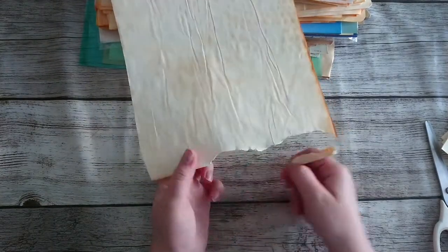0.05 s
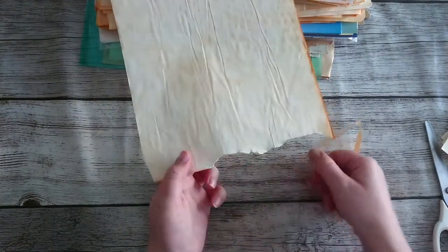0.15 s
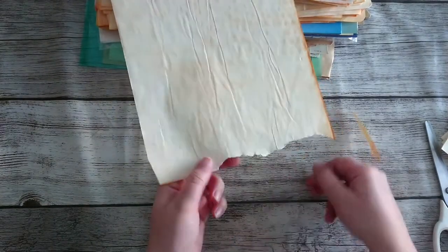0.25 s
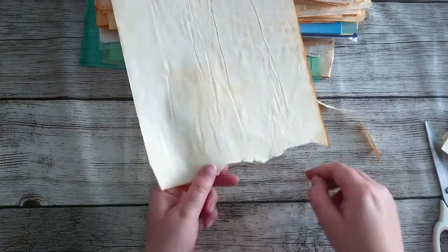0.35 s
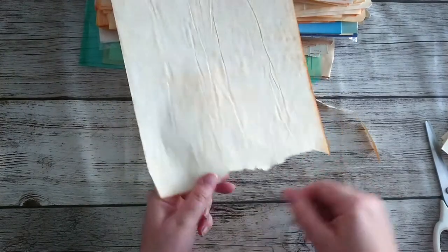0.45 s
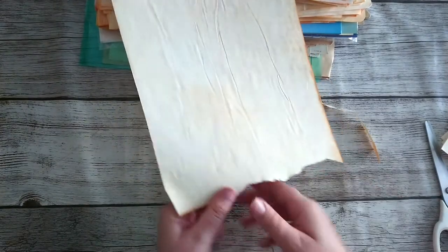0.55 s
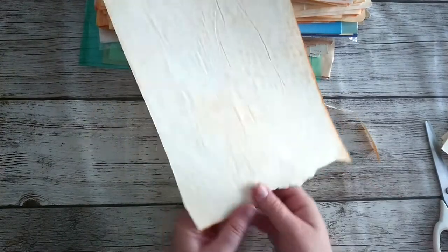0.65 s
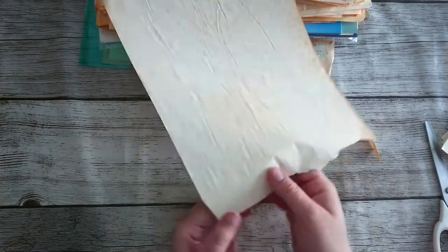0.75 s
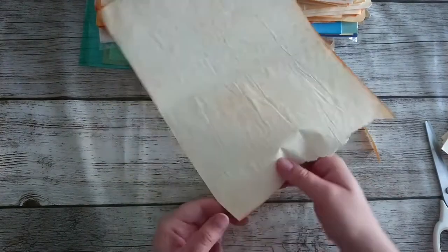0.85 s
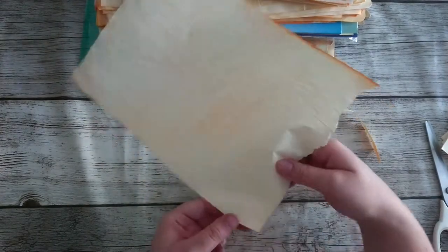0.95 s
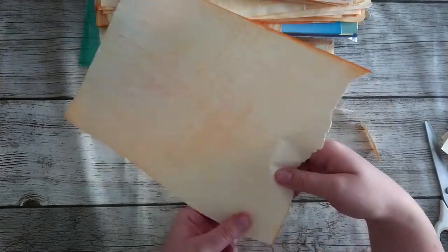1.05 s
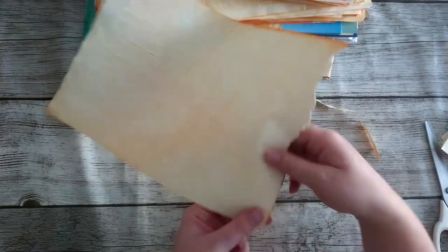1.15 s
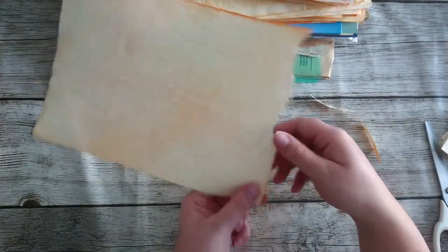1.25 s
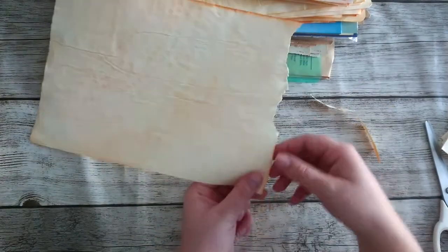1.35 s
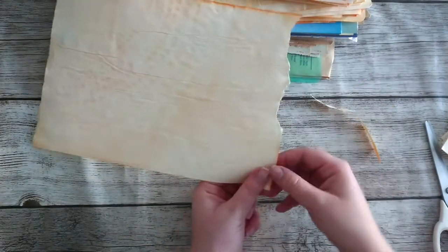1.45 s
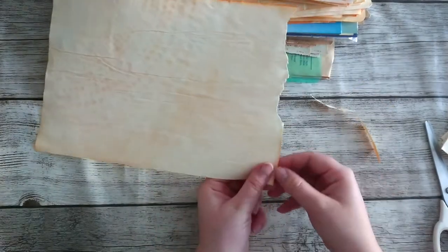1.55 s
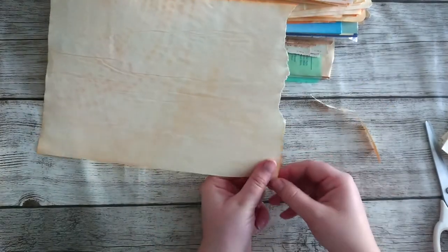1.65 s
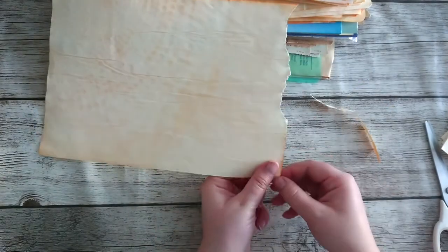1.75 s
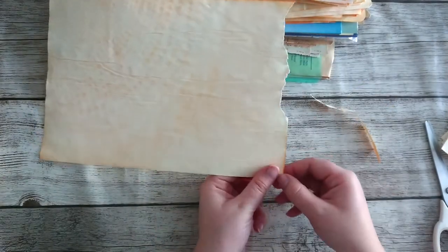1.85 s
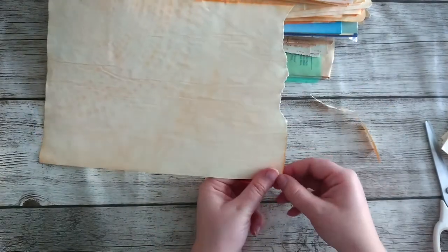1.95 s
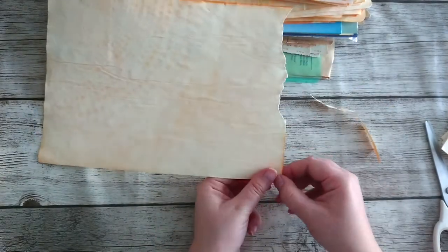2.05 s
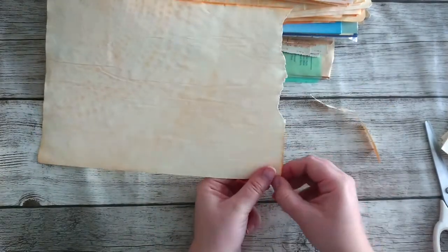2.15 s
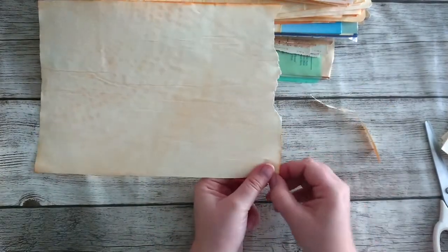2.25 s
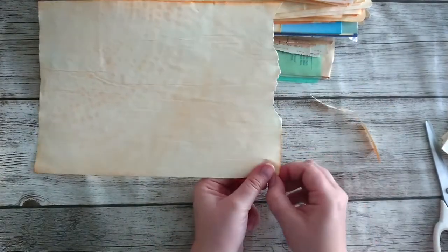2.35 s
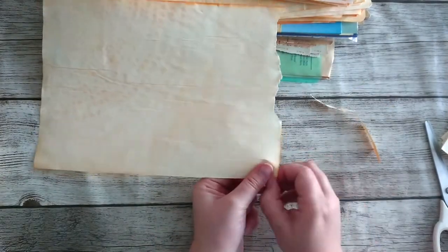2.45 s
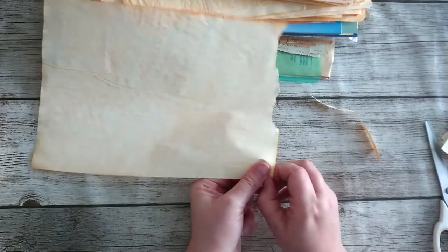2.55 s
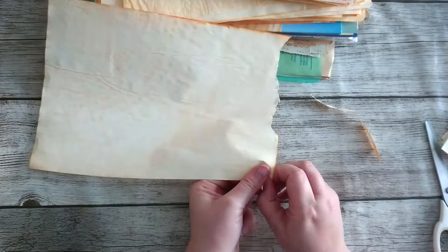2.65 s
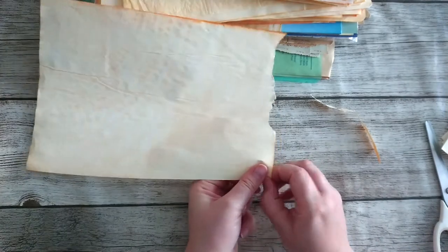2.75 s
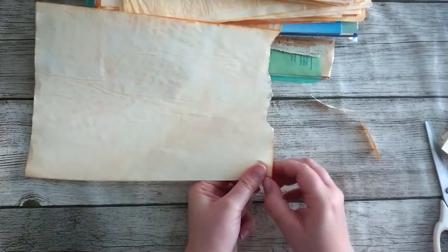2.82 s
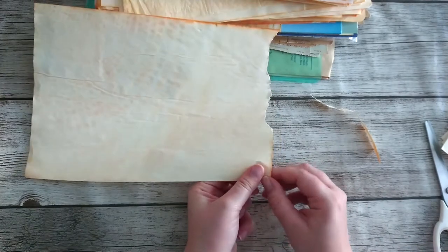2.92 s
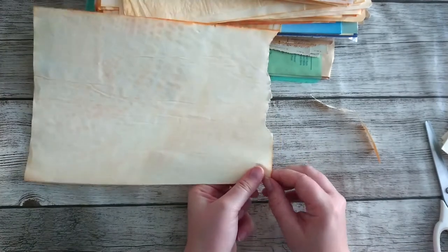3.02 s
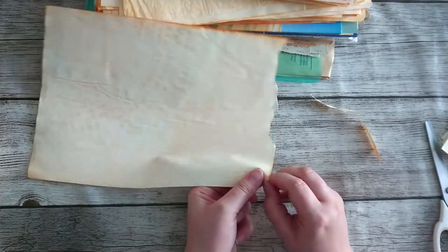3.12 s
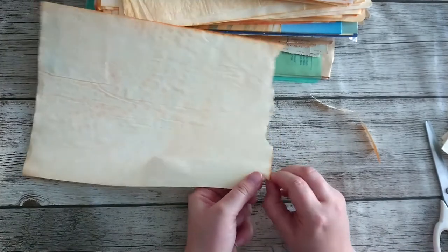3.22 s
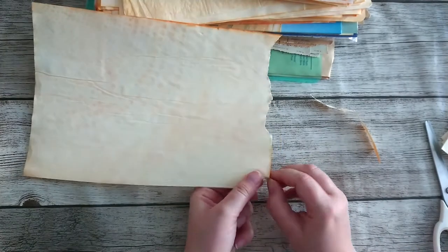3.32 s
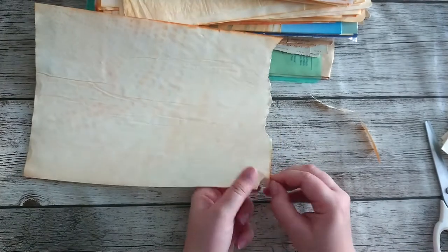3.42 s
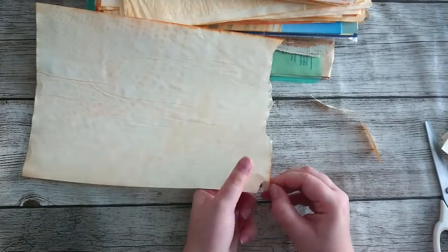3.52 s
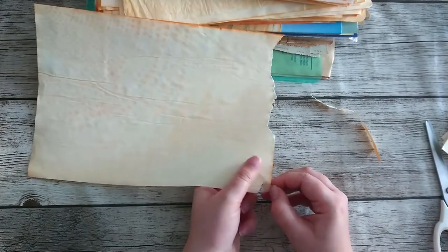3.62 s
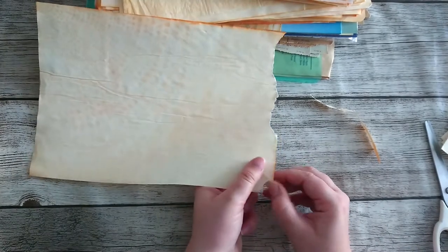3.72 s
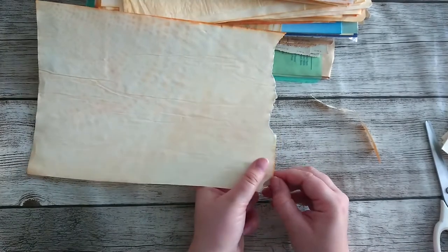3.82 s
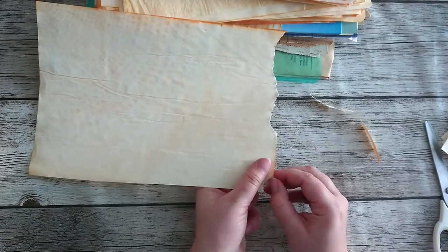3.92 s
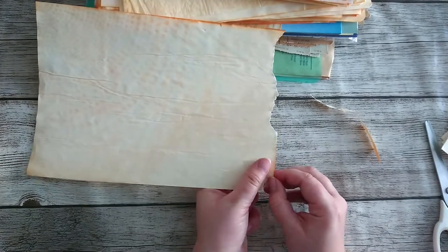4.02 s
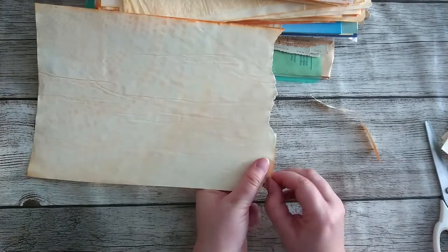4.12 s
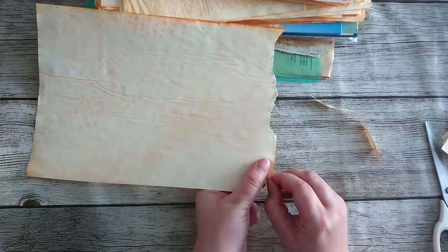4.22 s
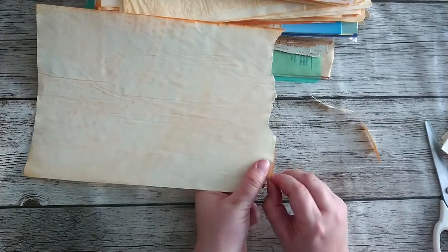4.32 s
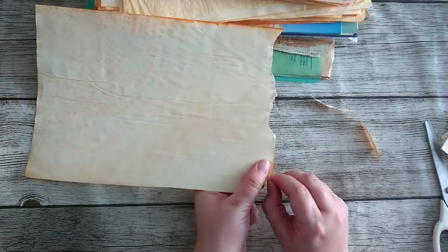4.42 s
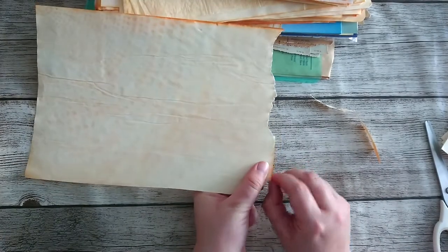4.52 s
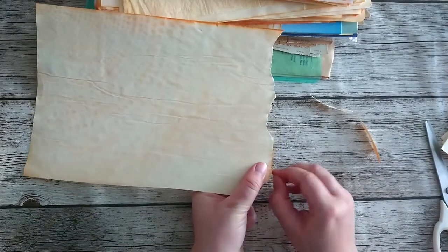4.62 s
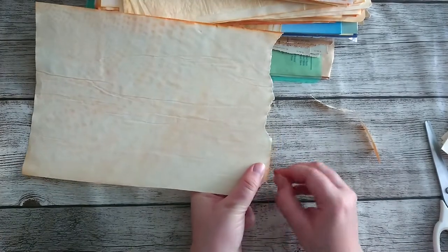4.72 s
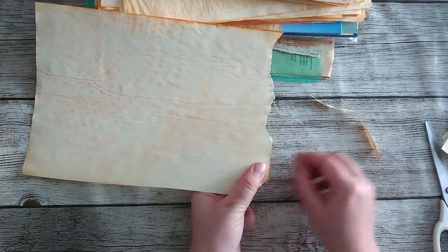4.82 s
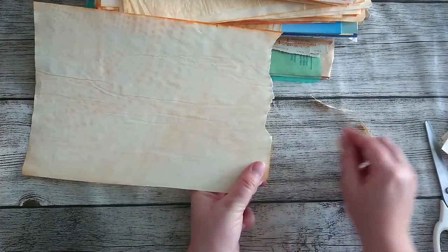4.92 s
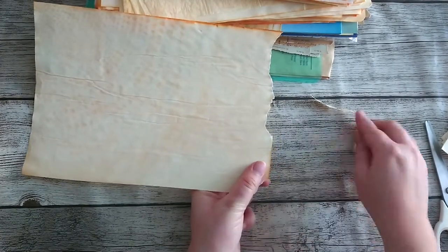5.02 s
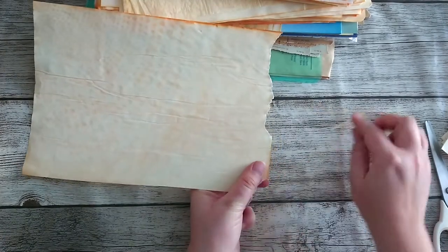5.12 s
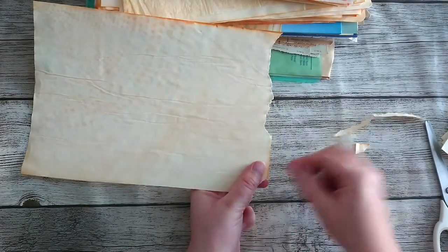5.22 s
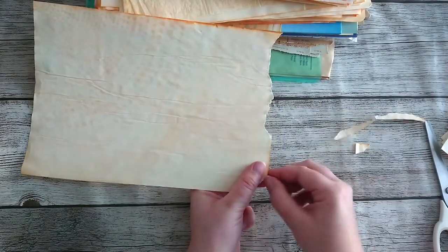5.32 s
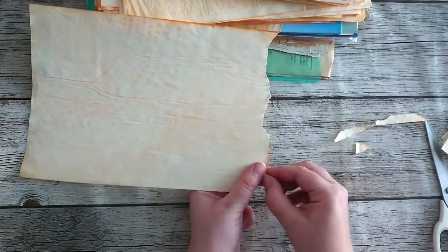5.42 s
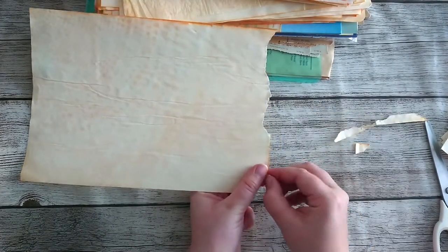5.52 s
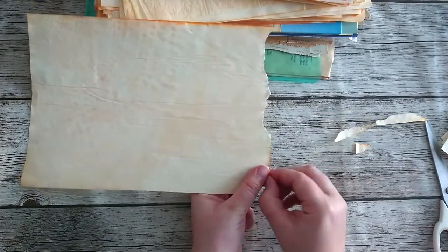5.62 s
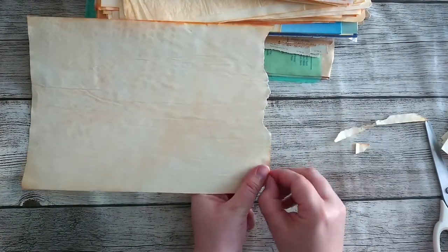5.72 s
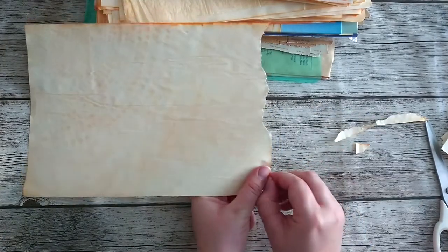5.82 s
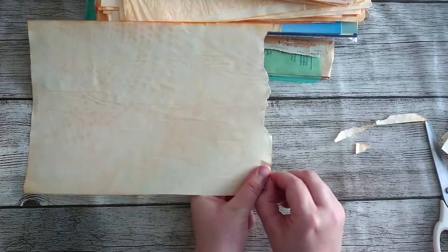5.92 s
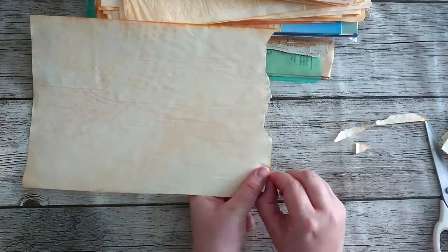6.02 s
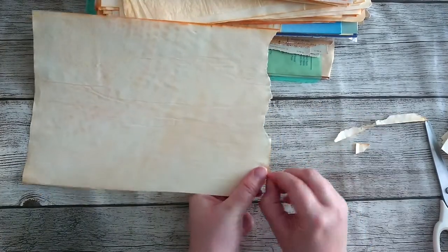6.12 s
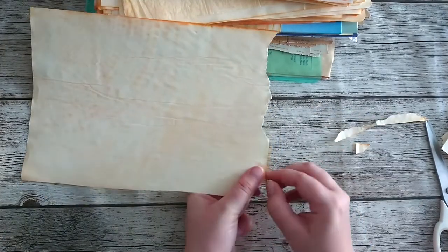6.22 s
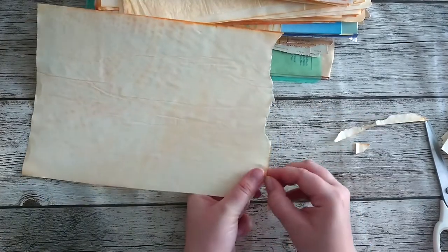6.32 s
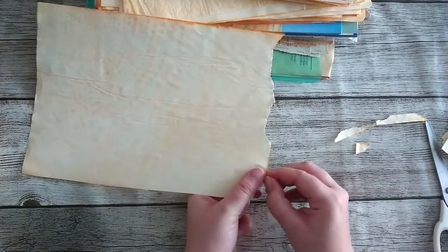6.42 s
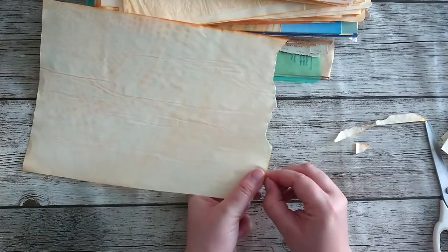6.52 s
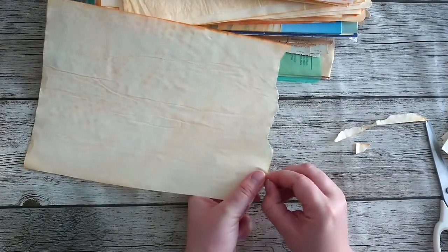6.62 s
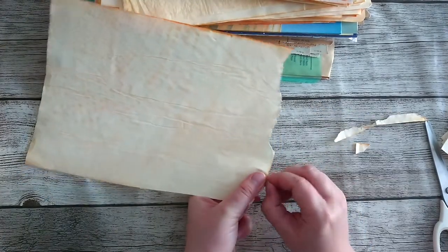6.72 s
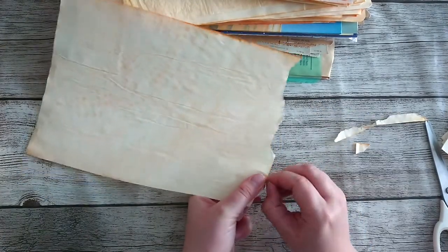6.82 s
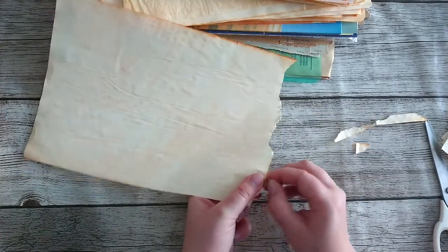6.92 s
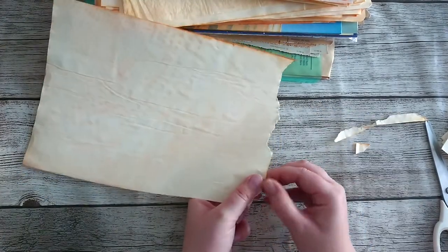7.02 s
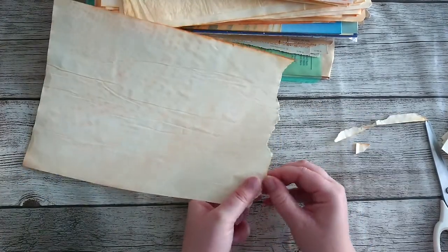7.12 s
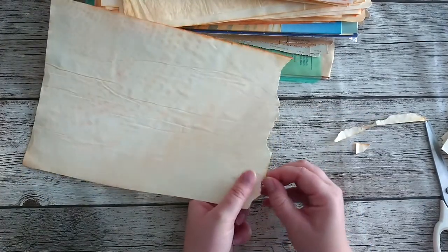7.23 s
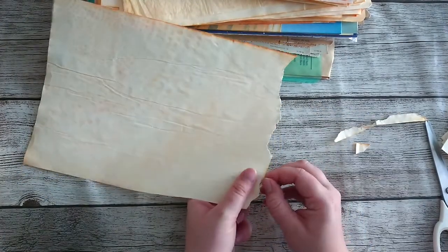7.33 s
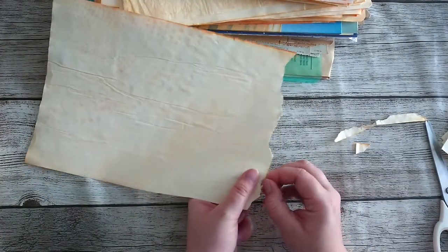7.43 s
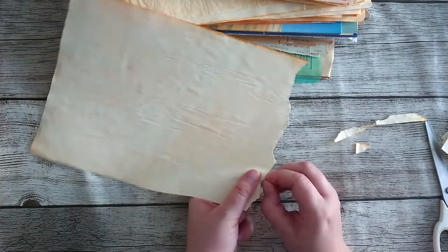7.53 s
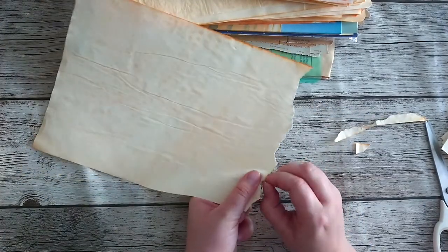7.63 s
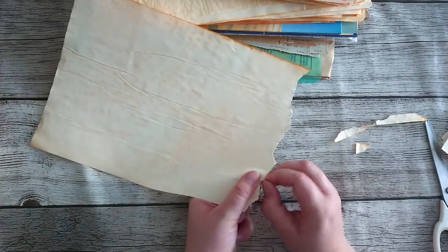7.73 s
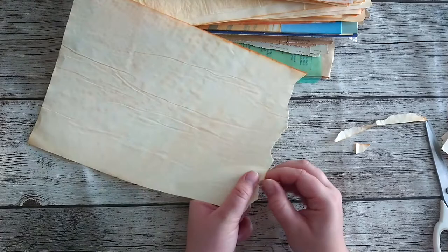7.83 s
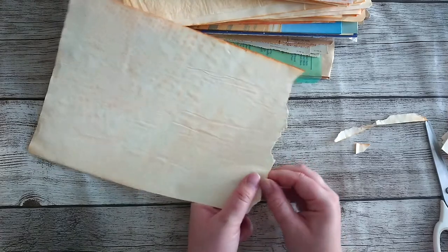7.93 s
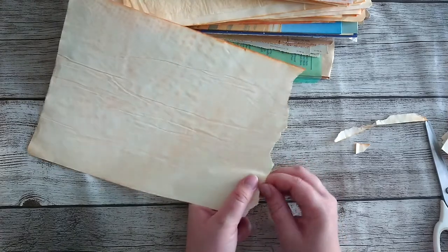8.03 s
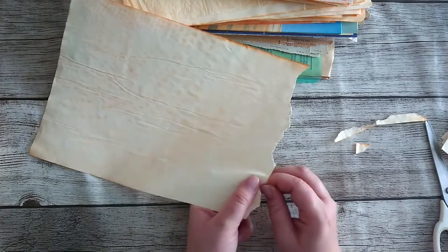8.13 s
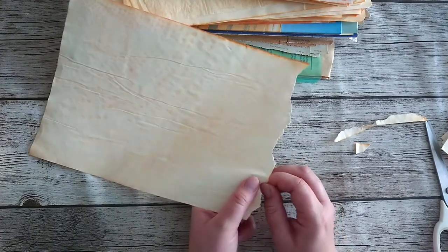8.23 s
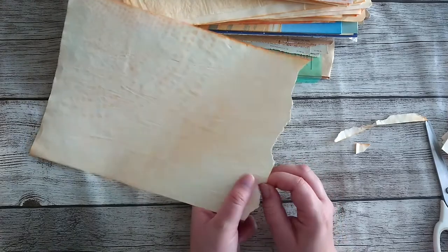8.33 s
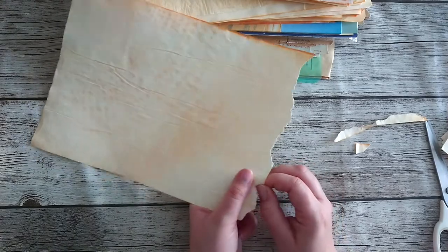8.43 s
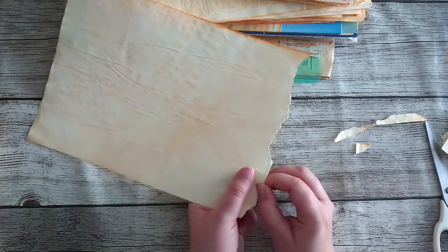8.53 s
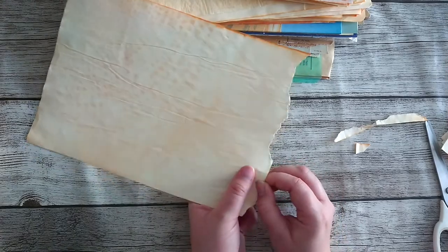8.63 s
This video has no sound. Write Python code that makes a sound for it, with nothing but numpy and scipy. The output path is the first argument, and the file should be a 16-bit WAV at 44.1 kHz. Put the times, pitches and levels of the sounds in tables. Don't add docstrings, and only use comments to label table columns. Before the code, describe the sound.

Hands tear thin strips from the edge of crisp aged paper over a wooden-looking table. First come a brief rustle and a cluster of loud crease pops while the sheet swings round, then quiet, bright ripping, a sharp release, a hushed gap, and busier stop-and-go tearing. Dry, close stereo pickup leaning slightly left, with short soft room reflections and faint low hush.

```python
import sys
import numpy as np
from scipy import signal
from scipy.fft import rfft, irfft, next_fast_len
from scipy.io import wavfile
from scipy.ndimage import uniform_filter1d

SR = 44100
rng = np.random.default_rng(int(sys.argv[2]) if len(sys.argv) > 2 else 0)


def attenuation_scalar(level_db):
    decades = np.asarray(level_db, float) / 20
    return 10 ** decades


def transcribe(signal):
    frames = np.atleast_2d(signal).T
    limited = np.clip(frames, -1, 1)
    pcm = np.round(limited * 32767).astype(np.int16)
    wavfile.write(sys.argv[1], SR, pcm)


N = 381906


def rms_one(x):
    return x / np.sqrt(np.mean(x ** 2) + 1e-20)


def in_time(rows):
    s, *columns = np.transpose(rows)
    return [np.interp(np.arange(N) / SR, s, column) for column in columns]


def at_hz(points, hz):
    table_hz, values = np.transpose(points)
    return np.interp(np.log(hz), np.log(table_hz), values)


def drift(rate):
    r = np.exp(-40 * np.pi * rate / SR)
    steps = rng.standard_normal(N // 20 + 2002)
    slow = signal.lfilter([1], [1, -2 * r, r * r], steps)[2000:]
    return np.interp(np.arange(N) / 20, np.arange(len(slow)), rms_one(slow))


def ring(x, hz, t60):
    r, w = attenuation_scalar(-60 / (t60 * SR)), 2 * np.pi * hz / SR
    return signal.lfilter([0, np.sin(w)], [1, -2 * r * np.cos(w), r * r], x + 1e-18)


def band_pass(x, low, high, order=2):
    return signal.sosfilt(signal.butter(order, [low, high], "band", fs=SR, output="sos"), x)


def bands(low_hz, count, size):
    edges = np.minimum(low_hz * 2 ** (np.arange(count + 1) / size), .45 * SR)
    return zip(edges, edges[1:], np.sqrt(edges[:-1] * edges[1:]))


def left_right(db):
    return attenuation_scalar(db * np.array([[1], [-1]]))


def at_ports(pair, low, high, hz):
    # f/Hz, likeness (0 to 1)
    likeness = [(60, 0.5), (180, 0.89), (550, 0.85), (1650, 0.48), (4970, 0.45), (15000, 0.65)]
    # f/Hz, level/dB
    left_lead = [(60, 5), (120, -2), (240, 18), (480, 12), (950, 5.5), (1890, 4), (3770, 8), (7520, 1.5),
                 (15000, -1)]
    mid, side = band_pass(pair, low, high)
    alike = np.clip(at_hz(likeness, hz), 0, .95 / (1 + (hz / 4000) ** 4))
    lean = left_right(at_hz(left_lead, hz) / 2)
    both = lean * (np.sqrt(1 + alike) * mid + np.sqrt(1 - alike) * side * [[1], [-1]])
    return both / np.sqrt(lean.mean() ** 2 * (1 + alike) * (high - low) / SR * 2)


def room_tone():
    # f/Hz, level/dB per Hz
    hush = [(18, -61), (30, -24), (100, -27.5), (120, -23), (307, -8), (350, 10.5), (691, -36),
            (1050, -7.5), (6210, -78), (7260, -50), (15500, -37.5)]
    white, out = rng.standard_normal((2, 2, N)), 0
    for k, (low, high, hz) in enumerate(bands(31.73, count=18, size=2)):
        band = at_ports(white[k % 2], low, high, hz)
        out = out + attenuation_scalar(at_hz(hush, hz)) * np.sqrt(high - low) * band
    level_db = -65
    return attenuation_scalar(level_db) * out / np.std(out.mean(axis=0))


def room(x):
    t60_s, wall_cut_hz = 0.26, 4900
    size = next_fast_len(N + SR)
    w = 2 * np.pi * np.arange(size // 2 + 1) / size
    dull = (1 + 1j * w * SR / (2 * np.pi * wall_cut_hz)) ** -.4
    out = np.zeros((2, len(w)), complex)
    for k, lag in enumerate(rng.uniform(.011, .037, size=12) * SR):
        loop = attenuation_scalar(-60 * lag / SR / t60_s) * dull * np.exp(-1j * w * round(lag))
        out[k % 2] += loop / (1 - loop) * (-1) ** (k // 2)
    return irfft(out * rfft(x, size), size)[:, :N]


def table_rumble():
    # f/Hz, width/Hz
    modes = [(72, 7), (145, 88)]
    # t/s, first mode level/dB, second mode level/dB
    wrists = [(0.0, -65, -63), (0.31, -91, -76.5), (1.18, -89, -66.5), (1.57, -94, -79.5),
              (2.478, -127, -68.5), (3.37, -82, -76), (3.81, -74, -65), (3.98, -82, -75), (5.35, -90, -82),
              (5.55, -73, -66), (5.93, -77, -72.5), (8.05, -90, -73.5), (8.16, -72, -79),
              (8.19, -86, -51.5), (8.27, -84, -52.5), (8.33, -74, -65), (8.66, -68, -68)]
    out = 0
    for (hz, width_hz), db in zip(modes, in_time(wrists)):
        shared, left, right = rng.standard_normal((3, N))
        push = shared + 0.87 * np.array([left, right])
        rumble = band_pass(push, hz - width_hz / 2, hz + width_hz / 2)
        out = out + attenuation_scalar(db - 6.5) * rms_one(rumble) * attenuation_scalar([[3.5], [-4.5]])
    return out


def over_table(x, gap_ms, sway_ms, echo_db):
    lag = np.clip(gap_ms + sway_ms * drift(1.17), .1, 2) * SR / 1000
    now = np.arange(N)
    echo = [np.interp(now - lag * side, now, channel) for channel, side in zip(x, (1.06, .94))]
    return (x + attenuation_scalar(echo_db) * np.array(echo)) / np.sqrt(1 + attenuation_scalar(2 * echo_db))


def clicks(rows, reach):
    out, t = np.zeros((2, N + 600)), np.arange(600) / SR
    click_ms, tail_ms, tail_db = 0.45, 3.0, -19
    shape = np.exp(-t * 1000 / click_ms) + attenuation_scalar(tail_db) * np.exp(-t * 1000 / tail_ms)
    noise = rng.standard_normal((len(rows), 3, 600))
    for (s, db, hz), (shared, *own) in zip(rows, noise):
        kick = shape * (shared + 0.4 * np.array(own)) + 2 * np.sign(shared[0]) * (t == 0)
        click = band_pass(kick, hz * 0.7, min(hz * reach, 12000), order=3)
        click = click / np.abs(click).max()
        click = click + 0.25 * ring(click, hz, 7 / hz) * hz / 4000
        i = round((s - .0006) * SR)
        out[:, i:i + 600] += attenuation_scalar(db) * left_right(1.5) * click / np.abs(click.mean(axis=0)).max()
    return out[:, :N]


def fibre_ticks():
    # t/s, peak level/dB, f/Hz
    fibres = [(5.594, -36, 800), (5.905, -36, 1400), (3.037, -33, 1690), (3.051, -32, 2000),
              (3.064, -35, 2070), (3.085, -44, 2100), (3.173, -18.5, 4200), (3.191, -17.5, 3900),
              (3.2, -18, 3430), (3.22, -24, 3850), (3.242, -22, 4350), (3.25, -16, 4200),
              (3.256, -19, 4800), (3.277, -24, 4500), (3.332, -18, 2600), (3.34, -26, 2600),
              (4.229, -43, 2350), (4.284, -39, 1700), (4.291, -39, 1400), (4.3, -51, 1500),
              (4.334, -51, 1400), (5.379, -40, 7000), (4.362, -36, 7500), (4.373, -45, 1600),
              (4.387, -37, 1350), (4.561, -45, 2200), (4.598, -32, 6500), (5.07, -27, 4700),
              (5.075, -44, 3700), (5.532, -40, 900), (6.076, -14.5, 3850), (6.337, -37, 2300),
              (6.367, -23, 1800), (6.506, -46, 1720), (6.553, -38, 1950), (6.768, -39, 2600),
              (6.792, -39, 2700), (6.879, -23, 3000), (6.887, -22, 2600), (7.256, -31, 2800),
              (8.346, -32, 3000), (7.626, -25, 2900), (7.632, -28, 4300), (7.665, -30, 2000),
              (7.674, -35, 3150), (8.041, -27.5, 6500), (8.097, -37, 2200), (8.133, -23, 3500),
              (8.156, -27, 3500), (8.171, -27, 3500), (8.196, -30, 5000), (8.203, -31, 3000),
              (8.249, -34, 3400), (8.285, -27, 2700), (8.32, -29, 2800), (8.33, -36, 3400),
              (8.348, -30, 2900), (8.472, -24, 1500), (8.495, -26, 2540), (8.623, -21, 2220)]
    return clicks(fibres, reach=2.4)


def crisp_breaks():
    # t/s, peak level/dB, lowest f/Hz
    breaks = [(0.787, -18, 1100), (0.849, -22, 1500), (1.0, -17, 900), (1.315, -15, 1200),
              (2.702, -27, 1800), (2.793, -21, 1250), (2.8, -33, 800), (4.42, -17, 1450),
              (5.791, -26, 1000), (6.107, -25, 2200), (7.376, -18, 1450), (8.315, -25, 2200),
              (8.527, -30, 900), (8.576, -30, 1800), (8.604, -32, 1000), (8.612, -33, 1100),
              (8.63, -32, 3500)]
    return clicks(breaks, reach=4.6)


def taut_patches():
    # t/s, hold/s, level/dB, f/Hz; the row at 258 Hz is a soft thump of the table
    patches = [(0.736, 0.0067, -32.5, 2380), (0.822, 0.11, -37, 1800), (0.913, 0.018, -38, 1500),
               (0.989, 0.0065, -24.5, 766), (1.315, 0.0054, -26.5, 2190), (2.684, .03, -48.5, 2440),
               (3.183, 0.035, -33.5, 3970), (3.252, 0.018, -29.5, 4640), (3.298, 0.048, -37.5, 2770),
               (4.413, 0.02, -41, 1940), (4.62, 0.023, -58, 7050), (5.061, 0.037, -59, 3900),
               (5.128, 0.018, -59, 7200), (5.378, 0.0067, -49.5, 7240), (5.441, 0.011, -56, 7060),
               (5.986, 0.05, -47.5, 2080), (6.061, 0.041, -40.5, 6700), (6.091, 0.023, -50, 2220),
               (6.206, 0.037, -43.5, 2170), (6.343, 0.049, -40, 1990), (6.663, 0.058, -56, 6840),
               (6.797, 0.063, -46, 2320), (6.877, 0.027, -32, 2660), (6.918, 0.014, -38, 1710),
               (7.023, 0.037, -42, 2630), (7.162, 0.0099, -43, 2600), (7.254, 0.045, -48.5, 6800),
               (7.253, 0.035, -42.5, 2880), (7.328, 0.063, -40, 2600), (7.552, 0.042, -49, 7400),
               (7.866, 0.052, -46, 2530), (7.92, 0.05, -40.5, 1860), (8.058, 0.014, -54, 8000),
               (8.118, 0.013, -34.5, 2700), (8.29, 0.032, -46, 2700), (8.426, 0.043, -45, 2290),
               (8.486, 0.011, -40, 2470), (8.191, 0.11, -61.5, 258), (5.383, 0.0092, -63, 10200),
               (5.52, .06, -57.5, 6800), (2.506, 0.037, -51.5, 1090), (7.352, 0.041, -53, 697),
               (8.093, 0.082, -51, 700), (1.885, 0.15, -51, 2070), (1.86, .17, -53, 1200),
               (1.886, 0.2, -53.5, 3500), (1.85, .26, -56.5, 5860), (0.727, .014, -42, 2400),
               (0.743, 0.0057, -34.5, 5950), (5.64, 0.012, -46.5, 2310), (5.742, 0.044, -50.5, 6860),
               (5.797, 0.12, -49.5, 2000)]
    rise_s, fall_s, width, grain_db = 0.0015, 0.007, 0.26, 4.5
    out, t = np.zeros((2, N + 14000)), np.arange(14000) / SR
    noise = rng.standard_normal((len(patches), 4, 14000))
    for (s, hold, db, hz), (shared, grain, *own) in zip(patches, noise):
        shape = np.minimum(t / rise_s, 1) * np.exp(-np.maximum(t - hold, 0) / fall_s)
        grains = attenuation_scalar(grain_db * rms_one(uniform_filter1d(grain, size=60)))
        rub = grains * (shared + 0.65 * np.array(own))
        song = rms_one(band_pass(rub, hz * (1 - width / 2), hz * (1 + width / 2)))
        i = round(s * SR)
        out[:, i:i + 14000] += attenuation_scalar(db) * left_right(1.6) * shape * song
    return out[:, :N]


def snaps():
    # t/s, peak level/dB, patch f/Hz
    folds = [(0.124, -21.5, 1190), (0.364, -41, 4200), (1.167, -17.5, 2040), (1.316, -10, 2040),
             (2.507, -53, 3530), (2.896, -22, 3820), (2.924, -23.5, 3470), (3.266, -23, 5270),
             (4.275, -36, 1700), (4.419, -13.5, 2470), (4.426, -21, 2020), (5.677, -30.5, 7000),
             (5.792, -22, 1320), (6.094, -25, 2270), (6.722, -39, 2420), (6.899, -16.5, 2760),
             (6.928, -23.5, 1900), (7.159, -42, 2440), (7.926, -22, 2440), (7.938, -20, 1790),
             (8.123, -39, 2880), (8.535, -23, 844), (8.594, -23, 1160)]
    # t/s, peak level/dB, patch f/Hz
    creases = [(0.55, -31, 1030), (0.622, -19, 1080), (0.633, -24.5, 900), (0.79, -17.5, 1150),
               (0.824, -15, 1750), (0.871, -20, 1720), (0.921, -16, 1730), (1.001, -13, 2580),
               (1.831, -30.5, 5950), (3.148, -27, 2740), (3.316, -23, 2800), (3.398, -19, 3220),
               (3.74, -25.5, 1690), (4.02, -28.5, 2460), (4.439, -13, 2160), (4.617, -15, 7150),
               (4.96, -44.5, 1240), (5.443, -37, 2470), (6.119, -18.5, 2460), (6.884, -20.5, 2800),
               (8.385, -18, 2800)]
    # t/s, peak level/dB, patch f/Hz
    cracks = [(0.49, -28.5, 1380), (0.744, -14.5, 2700), (0.991, -10.5, 930), (1.677, -22.5, 5070),
              (2.678, -32, 2460), (3.162, -21.5, 4160), (3.294, -17, 2980), (3.31, -12.5, 7030),
              (3.836, -26.5, 1800), (5.986, -24, 2340), (6.058, -22, 2280), (6.249, -27, 9100),
              (6.289, -30.5, 5850), (8.621, -23, 1330), (8.275, -27, 800)]
    kinds = (folds, -22), (creases, -14), (cracks, -2)
    rows = [(*row, edge_db) for kind, edge_db in kinds for row in kind]
    out, t = np.zeros((2, N + 1500)), np.arange(1500) / SR
    noise = rng.standard_normal((len(rows), 3, 1500))
    shape = (1 - np.exp(-t / .0004)) * (np.exp(-t / .001) + .33 * np.exp(-t / .006))
    for (s, db, hz, edge_db), (shared, *own) in zip(rows, noise):
        kick = shape * (shared + 0.49 * np.array(own)) + 0.6 * (t == t[22])
        patch = ring(kick, hz, 9 / hz)
        patch = patch + .5 * ring(kick, hz * 1.55, 7 / hz) - .4 * ring(kick, hz * .62, 5 / hz)
        rattle = band_pass(kick, hz * 0.23, min(hz * 4.3, 11000))
        edge = band_pass(shape * np.array(own), 4500, 10500)
        parts = (patch, 0), (rattle, -2.5), (edge, edge_db - 3.5)
        snap = sum(attenuation_scalar(g) * part / np.abs(part[0]).max() for part, g in parts)
        i = round((s + .0004) * SR)
        out[:, i:i + 1500] += attenuation_scalar(db - 7.0) * left_right(1.8) * snap
    snap_bass_cut = signal.butter(4, 420, "high", fs=SR, output="sos")
    return signal.sosfilt(snap_bass_cut, out[:, :N])


def hands():
    # t/s, level/dB
    grip = [(0.0, -38), (0.25, -58), (0.8, -51), (1.3, -36.5), (1.5, -57.5), (2.1, -50.5), (2.45, -60),
            (2.8, -51.5), (3.0, -65), (3.6, -60), (4.2, -58.5), (4.6, -48.5), (5.0, -70.5), (5.36, -73.5),
            (5.65, -52.5), (6.7, -54.5), (7.78, -55), (8.66, -54)]
    # t/s, hold/s, rub level/dB, hiss above rub level/dB
    slides = [(0.0, 0.067, -50.5, 9), (0.36, 0.05, -48.5, 8), (0.59, 0.013, -41.5, -0.5),
              (0.7, 0.026, -41.5, -2.5), (0.8, 0.057, -33.5, -3), (0.9, 0.12, -35.5, 1.5),
              (1.086, 0.024, -42.5, 10), (1.22, .11, -35, 2.5), (1.4, 0.0067, -40, -4.5),
              (1.57, 0.076, -51, -1), (2.84, 0.017, -47, -3.5), (4.28, 0.0063, -59, -9),
              (5.14, 0.0067, -62.5, 4.5), (4.91, 0.029, -93, 31), (5.53, 0.084, -50, -4),
              (8.01, 0.013, -41.5, -4), (8.28, 0.015, -46, -9), (8.54, 0.085, -40.5, -16)]
    rips = [(1.9, 0.095, -47.5, 3), (2.03, 0.084, -49, -1), (2.515, 0.011, -40.5, -8.5),
            (2.6, .03, -47, -15), (2.685, 0.018, -37, -2.5), (3.1, 0.086, -42.5, -12),
            (3.21, 0.0075, -35.5, 1), (3.27, 0.049, -31.5, 3), (3.39, 0.03, -36.5, -5.5),
            (3.5, 0.22, -45, -11.5), (3.72, 0.054, -38, -7.5), (3.93, 0.13, -54.5, -4),
            (4.13, 0.023, -48, -15), (4.565, 0.025, -41, -19), (4.62, 0.038, -39.5, 2.5),
            (5.69, 0.042, -47, -12), (6.07, 0.032, -32.5, -8.5), (6.53, 0.047, -42.5, -23),
            (6.66, 0.044, -42, -12.5), (6.8, 0.085, -43, -5), (6.885, 0.017, -36, -6.5),
            (7.54, 0.011, -36, -10.5), (7.61, 0.057, -39.5, -8.5), (7.845, 0.016, -49.5, 1.5),
            (8.145, 0.019, -43, 0.5), (8.43, 0.052, -37.5, -7.5), (8.51, 0.018, -52, 2)]
    tugs = [(2.31, 0.061, -45.5, -7.5), (2.9, 0.0081, -43, -3.5), (3.0, 0.0028, -47.5, -11),
            (3.81, 0.031, -35, -13), (3.88, 0.035, -42.5, -10.5), (5.85, 0.041, -43.5, -13.5),
            (6.2, 0.032, -48, -9), (7.0, 0.077, -35, -10.5), (7.262, 0.028, -39, -7.5),
            (7.335, 0.039, -44, -6), (7.97, 0.025, -39, -8), (8.29, 0.038, -53, -6.5)]
    releases = [(0.742, 0.0042, -35, 0.5), (0.99, 0.08, -39, 9), (1.677, 0.065, -48, 11.5),
                (1.83, 0.072, -53, 3), (3.035, 0.025, -47, -14), (4.36, 0.055, -67, 7),
                (4.419, 0.044, -37.5, -14), (5.381, 0.02, -54, -12), (5.45, 0.11, -52, -8),
                (5.742, 0.059, -49.5, -1.5), (5.677, 0.0092, -50, -1), (5.995, 0.021, -45.5, -10),
                (6.365, 0.015, -38, -10.5), (7.15, 0.006, -39.5, -9), (8.395, 0.018, -50.5, 7)]
    brushes = [(1.17, 0.038, -48, -1.5), (1.36, 0.041, -50.5, 6), (1.74, 0.03, -54, 4.5),
               (2.32, 0.015, -57, 5.5), (2.52, .01, -60, -2), (4.435, .015, -48, -0.8),
               (4.575, 0.012, -54, 2.5), (6.91, .02, -59, 7), (7.63, 0.049, -52, -8), (7.85, .01, -64, 3),
               (8.14, 0.056, -47.5, -10), (8.25, .01, -61, 2), (8.32, 0.027, -60.5, 5.5)]
    jerks = [(5.984, 0.012, -41.5, -1), (6.21, 0.025, -41.5, -7.5), (6.288, .008, -54, -4),
             (6.34, 0.045, -46.5, -6), (6.876, 0.025, -48, -10), (6.92, 0.009, -32, -23),
             (7.33, 0.018, -45, -11), (7.36, 0.026, -32.5, -28), (7.837, 0.079, -38.5, -10.5),
             (7.926, 0.037, -28.5, -17.5), (8.12, .02, -35.5, -2.5), (8.245, 0.0073, -39, -10),
             (8.265, 0.074, -39, -2.5), (8.325, 0.025, -51, -3), (8.382, 0.017, -36, -9),
             (8.485, 0.015, -33, -12), (3.192, 0.014, -40.5, 4), (2.9, 0.015, -42, -1),
             (7.16, 0.0094, -33.5, -18), (8.424, .03, -44, -6)]
    # rise/dB per s, fall/dB per s, flexing above rub level/dB, dust above hiss level/dB
    slide = (181, 140.5, 0, -18)
    rip = (374, 216, -12, -22)
    tug = (236, 418, -12.5, -24)
    release = (1192, 252, -5.5, -21)
    brush = (307, 260, 2.3, 2.5)
    jerk = (1498.5, 901, -8, -25.5)
    strokes = ((slides, slide), (rips, rip), (tugs, tug), (releases, release),
               (brushes, brush), (jerks, jerk))
    hiss_steeper, dust_swing = 1.175, 1.7
    t = np.arange(0, N + 64, 64)[:, None] / SR
    grip_db = np.interp(t[:, 0], *np.transpose(grip))
    power = attenuation_scalar(2 * (grip_db + np.array([[0], [0], [-10.5], [-35.5]])))
    for rows, (rise, fall, flex_db, dust_db) in strokes:
        s, hold, db, hiss_db = np.transpose(rows)
        loss_db = rise * np.maximum(s - t, 0) + fall * np.maximum(t - s - np.abs(hold), 0)
        rub = db - loss_db
        hiss = db + hiss_db - hiss_steeper * loss_db
        dust = dust_db - 40 + dust_swing * (hiss + 40)
        layers = rub + flex_db, rub, hiss, dust
        power = power + np.array([attenuation_scalar(2 * layer).sum(axis=1) for layer in layers])
    return [np.interp(np.arange(N) / SR, t[:, 0], 10 * np.log10(p)) for p in power]


def crackle(depth_db, per_s, crack_ms):
    clump_db, bed = 6.5, 0.55
    born = rng.random(N) < per_s * attenuation_scalar(clump_db * drift(35)) / SR
    sizes = attenuation_scalar(depth_db * np.minimum(rng.exponential(1, N), 3.5))
    r = np.exp(-1000 / (crack_ms * SR))
    shape = bed + signal.lfilter([1], [1, -r], (sizes - 1) * born)
    return shape / np.sqrt(uniform_filter1d(shape ** 2, size=1100))


def paper():
    # low f/Hz, high f/Hz
    hand_bands = [(450, 1400), (1400, 4200), (4200, 11000)]
    # f/Hz, level/dB per Hz
    colour = [(120, -51), (200, -25.5), (404, -4.5), (625, -5.5), (818, 0), (1400, 3.5), (1830, -1),
              (2650, 4), (6220, -8.5), (6880, -10), (11000, -18), (14300, -48), (22000, -120)]
    *levels, dust_db = hands()
    usual = []
    for low, high in hand_bands:
        mean_power = np.mean(attenuation_scalar(2 * at_hz(colour, np.linspace(low, high, num=200))))
        usual.append(10 * np.log10(mean_power * (high - low)))
    centres = np.log([np.sqrt(low * high) for low, high in hand_bands])
    depth_db = np.clip(0.4 + 0.055 * (levels[1] + 66.0), 0, 5)
    bundles = crackle(depth_db, per_s=416, crack_ms=1.0)
    pops = crackle(depth_db, per_s=289, crack_ms=1.5)
    fibres = crackle(depth_db, per_s=900, crack_ms=0.3)
    white = rng.standard_normal((2, 2, N))
    dull, bright = (bundles * pops) ** .75 * white, (bundles * fibres) ** .75 * white
    slips, out = drift(40), 0
    for k, (low, high, hz) in enumerate(bands(214.9, count=17, size=3)):
        share = [np.interp(np.log(hz), centres, row) for row in np.eye(3)]
        level_db = sum(w * (db - u) for w, db, u in zip(share, levels, usual))
        patch_db = 1.0 * slips + 2.2 * drift(30) + 1.0 * drift(5)
        drive = (dull if hz < 3500 else bright)[k % 2]
        gain = attenuation_scalar(level_db + at_hz(colour, hz) + patch_db - 4.5) * np.sqrt(high - low)
        out = out + gain * at_ports(drive, low, high, hz)
    air = attenuation_scalar(dust_db + 2.3 * slips - 0.5) * at_ports(bright[1], 11500, 16700, 15000)
    return over_table(out, gap_ms=.47, sway_ms=.05, echo_db=-10), air


def scene():
    # t/s, towards the left port level/dB
    hand_path = [(0.0, -0.5), (0.72, 2), (1.08, -1), (3.1, 3), (3.3, -2.5), (4.3, 4.5), (4.41, -4.5),
                 (4.5, -1), (5.3, 2), (5.5, 1.5), (8.66, -0.5)]
    sheet, air = paper()
    near = sheet + snaps() + fibre_ticks() + taut_patches() + crisp_breaks()
    near = signal.sosfilt(signal.cheby2(8, 30, 12100, fs=SR, output="sos"), near)
    lean = left_right(in_time(hand_path)[0] / 2)
    echo = attenuation_scalar(-13.5) * room(near.mean(axis=0))
    return lean * (near + air) + echo + table_rumble() + room_tone()


def peak(x, hz, width_hz, db):
    r = np.exp(-np.pi * width_hz / SR)
    top, bottom = (1 - r * r) / 2 * np.array([1, 0, -1]), [1, -2 * r * np.cos(2 * np.pi * hz / SR), r * r]
    return x + (attenuation_scalar(db) - 1) * signal.lfilter(top, bottom, x)


def roll_off(x):
    return signal.sosfilt(signal.butter(12, 15830, fs=SR, output="sos"), x)


def record(dry):
    # f/Hz, width/Hz, level/dB
    body = [(7010, 790, 5.5), (6320, 230, -8), (4040, 570, -3.5), (5160, 790, 1), (940, 490, 1)]
    # f/Hz, width/Hz, level/dB
    airy_stripes = [(11800, 500, -2), (12600, 500, 3), (13500, 700, -4), (14900, 700, 4)]
    late = np.interp(np.arange(N) - 2, np.arange(N), dry[1])
    x = np.array([dry[0], late])
    for hz, width_hz, db in [*body, *airy_stripes]:
        x = peak(x, hz, width_hz, db)
    x = signal.sosfilt(signal.cheby2(12, 70, 16250, fs=SR, output="sos"), x)
    return roll_off(x)


dry = scene()
out = record(dry)
transcribe(out)
```